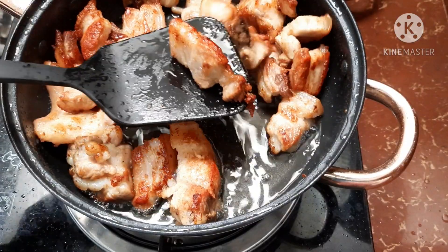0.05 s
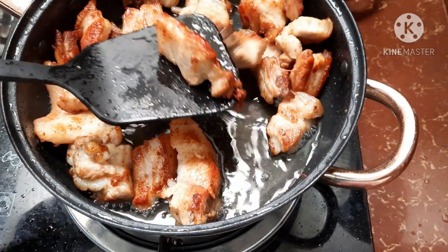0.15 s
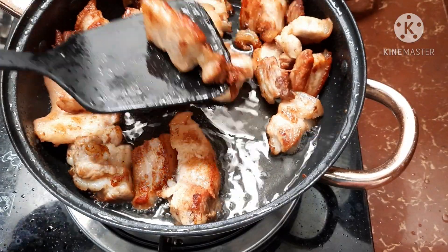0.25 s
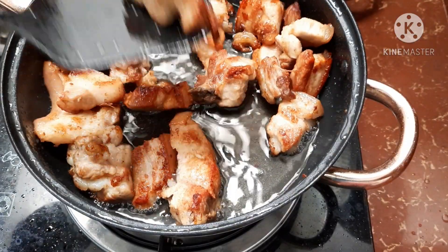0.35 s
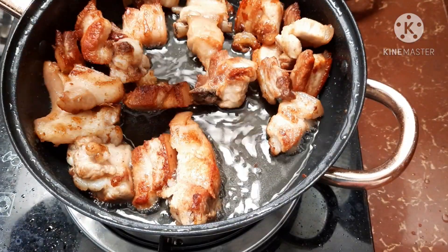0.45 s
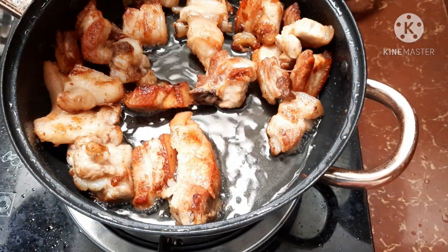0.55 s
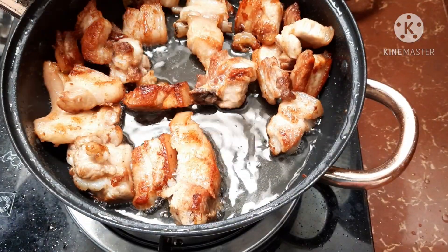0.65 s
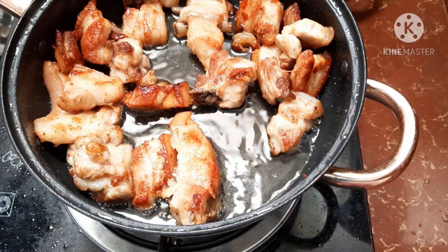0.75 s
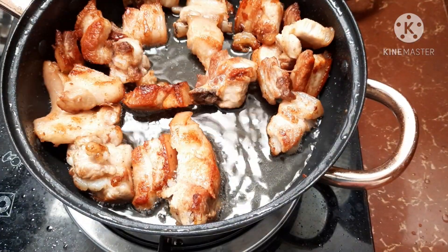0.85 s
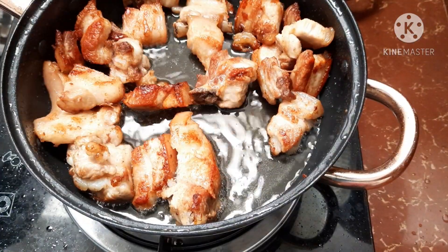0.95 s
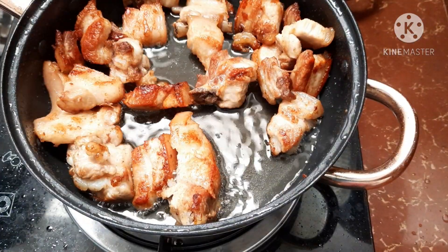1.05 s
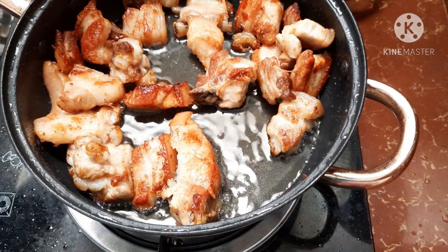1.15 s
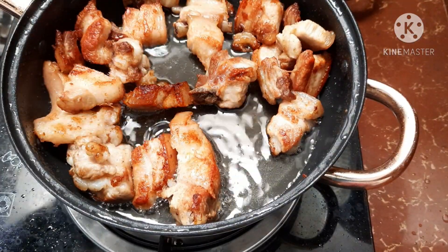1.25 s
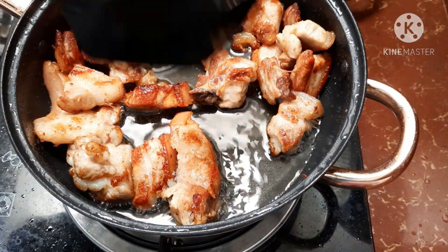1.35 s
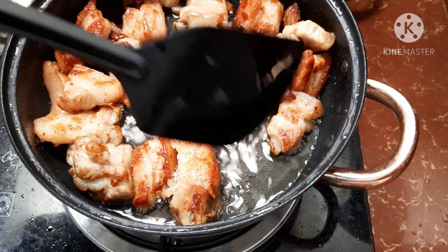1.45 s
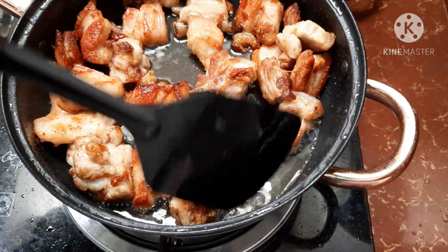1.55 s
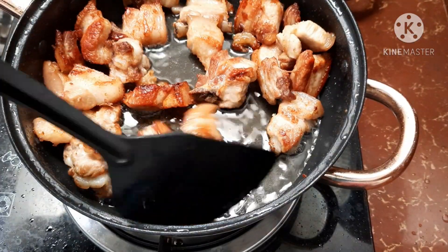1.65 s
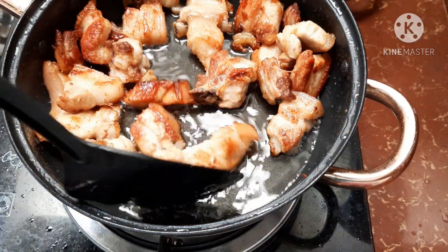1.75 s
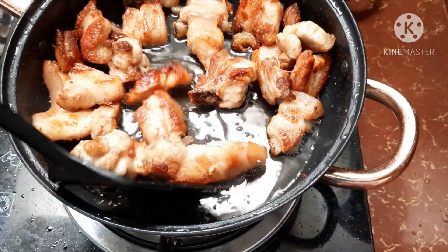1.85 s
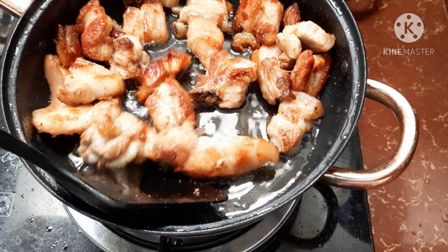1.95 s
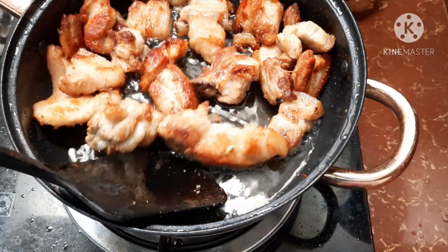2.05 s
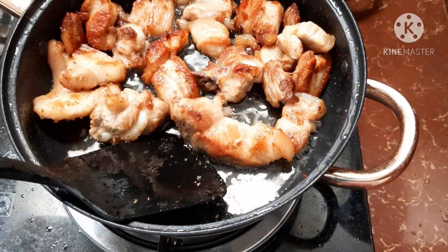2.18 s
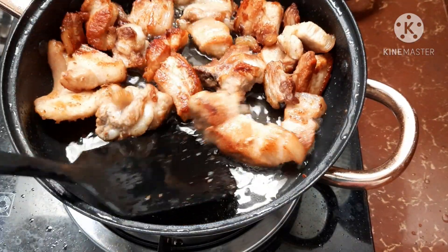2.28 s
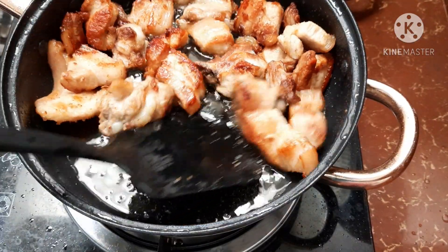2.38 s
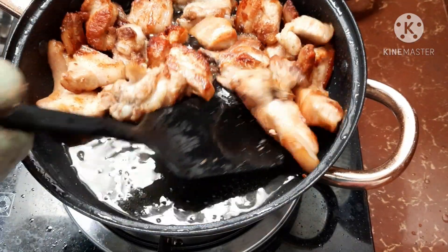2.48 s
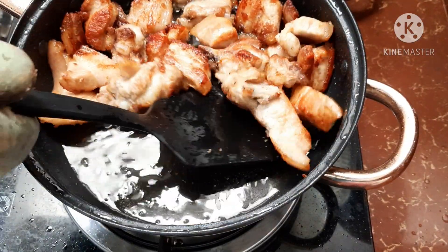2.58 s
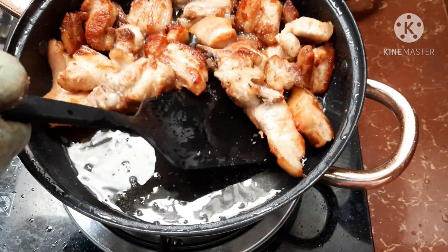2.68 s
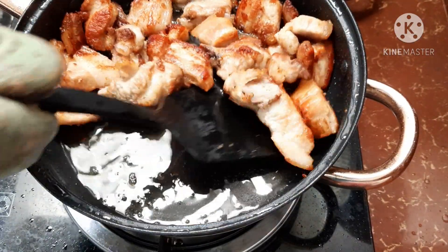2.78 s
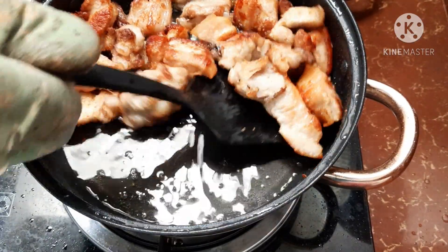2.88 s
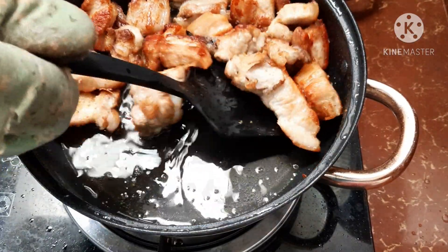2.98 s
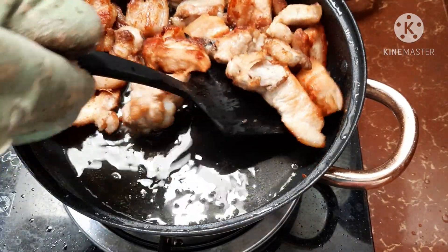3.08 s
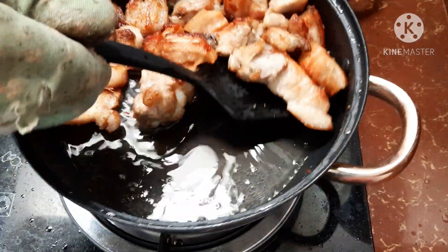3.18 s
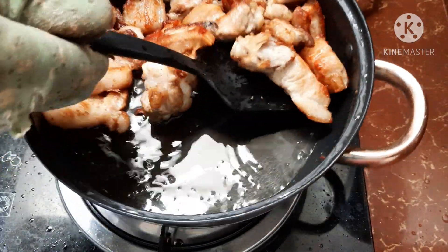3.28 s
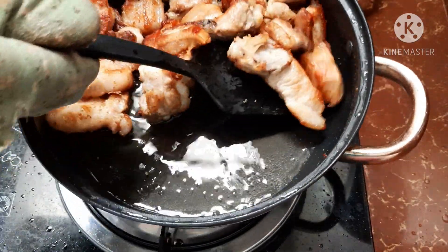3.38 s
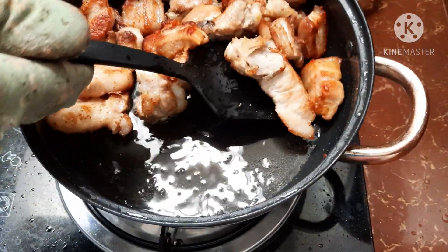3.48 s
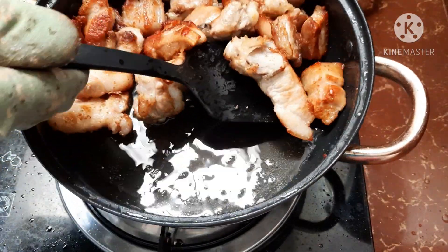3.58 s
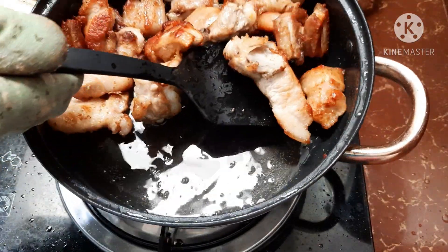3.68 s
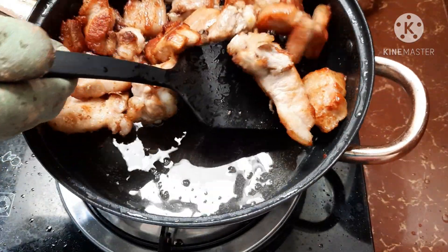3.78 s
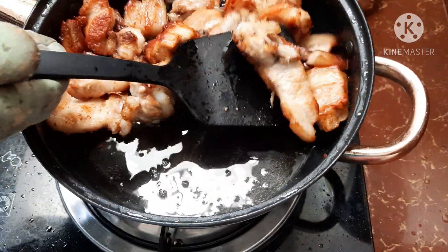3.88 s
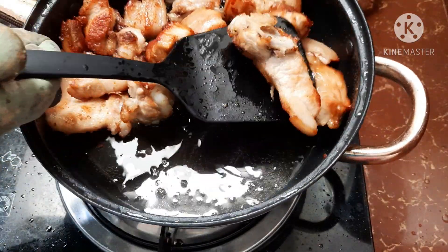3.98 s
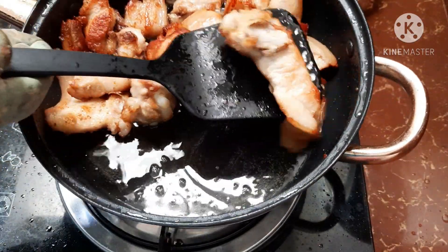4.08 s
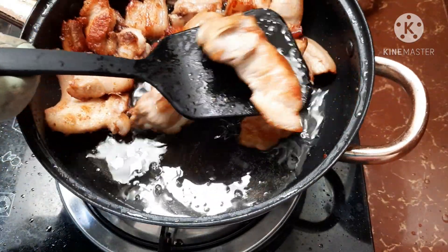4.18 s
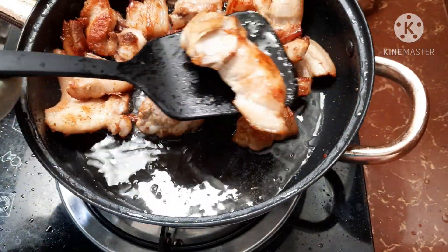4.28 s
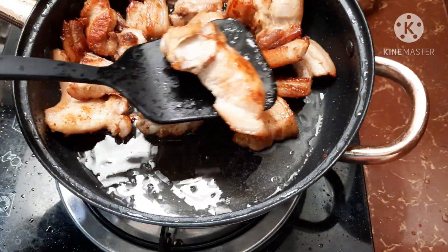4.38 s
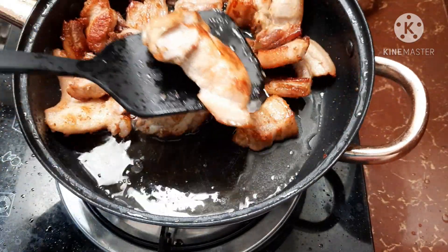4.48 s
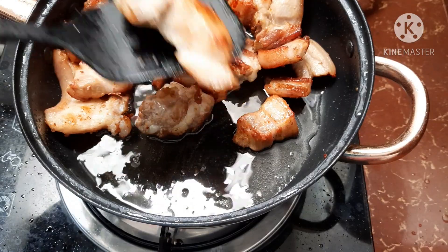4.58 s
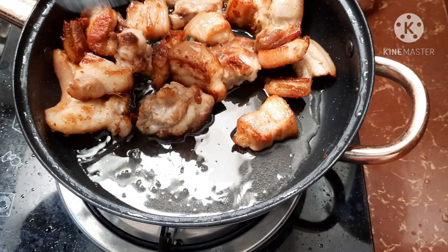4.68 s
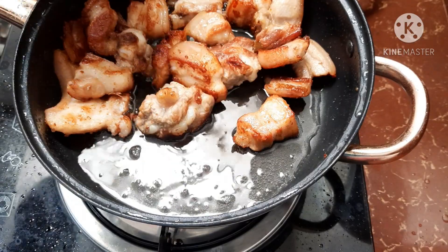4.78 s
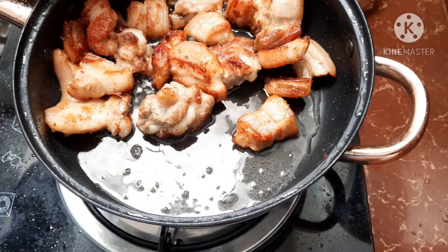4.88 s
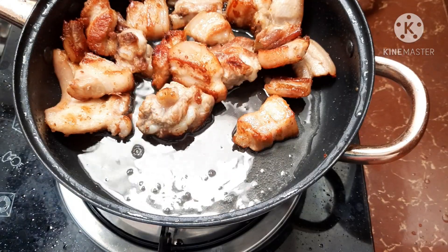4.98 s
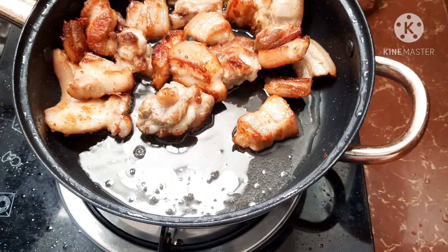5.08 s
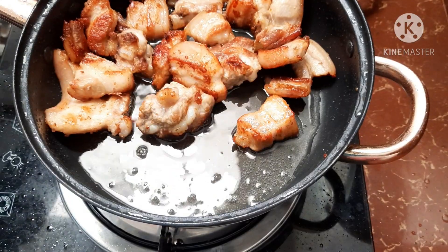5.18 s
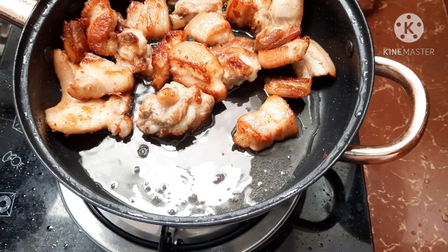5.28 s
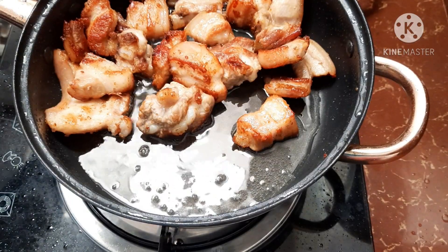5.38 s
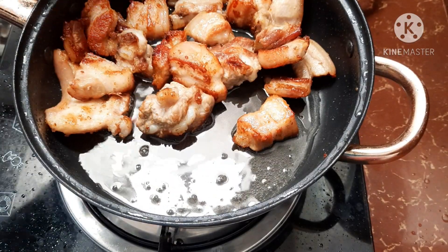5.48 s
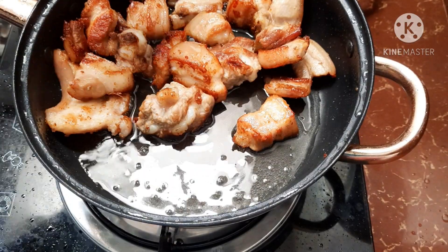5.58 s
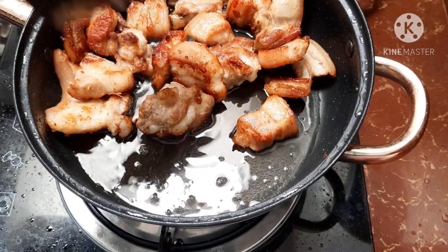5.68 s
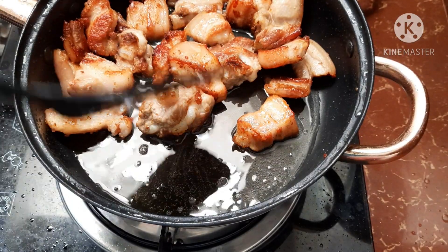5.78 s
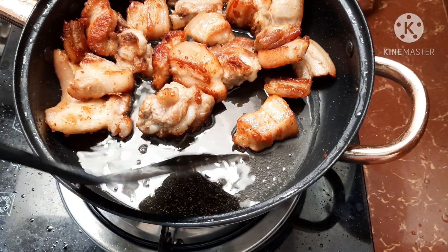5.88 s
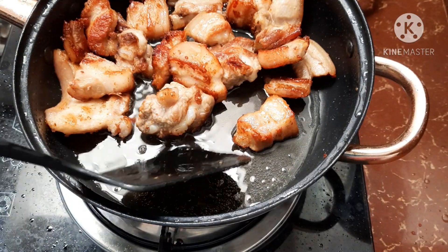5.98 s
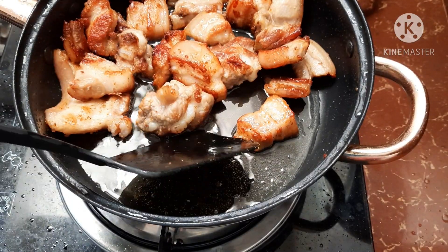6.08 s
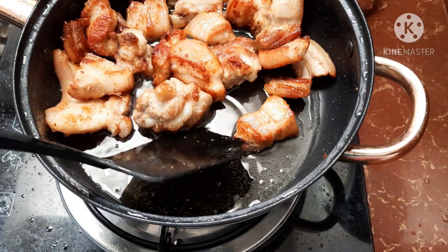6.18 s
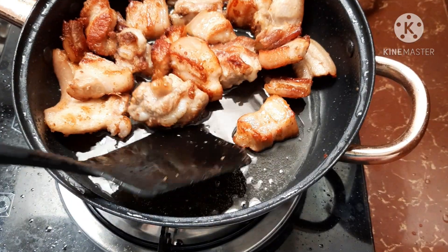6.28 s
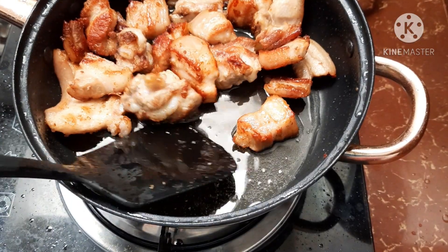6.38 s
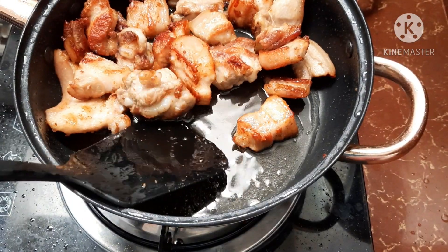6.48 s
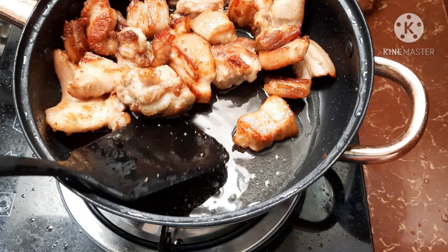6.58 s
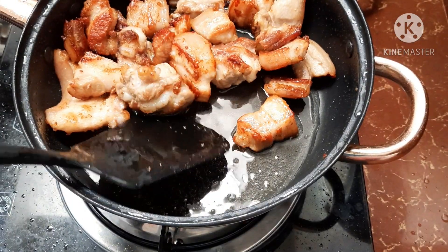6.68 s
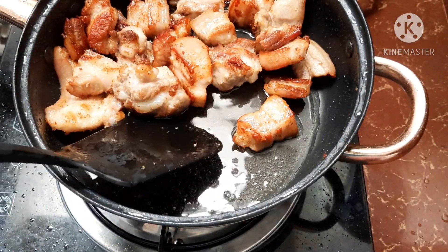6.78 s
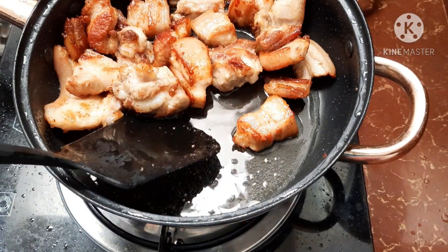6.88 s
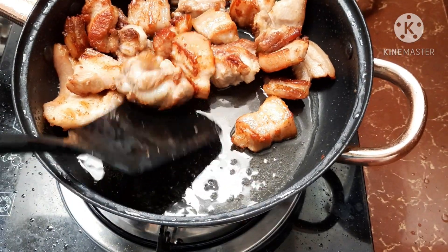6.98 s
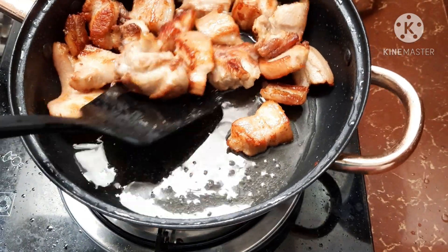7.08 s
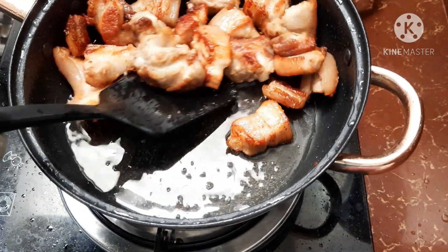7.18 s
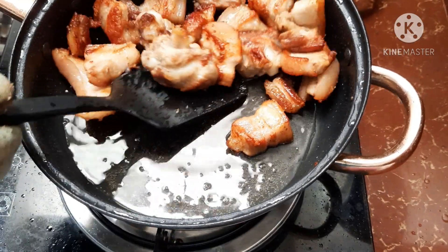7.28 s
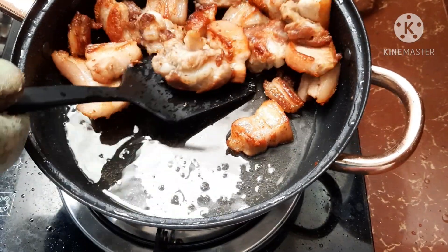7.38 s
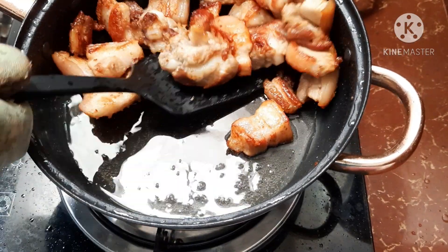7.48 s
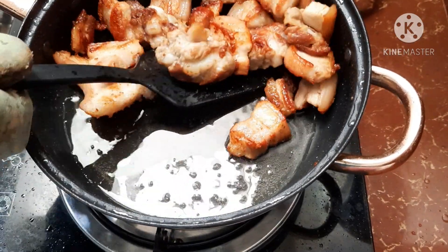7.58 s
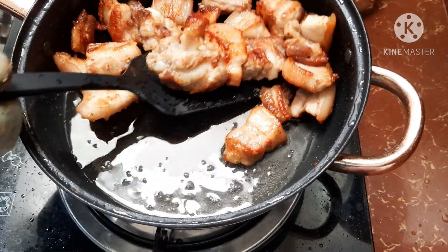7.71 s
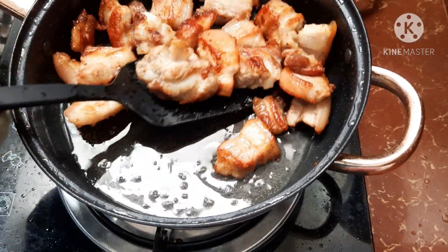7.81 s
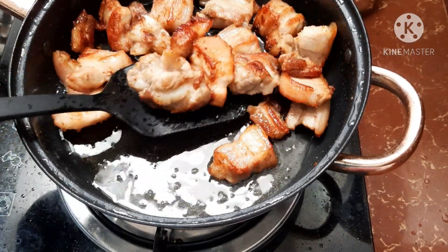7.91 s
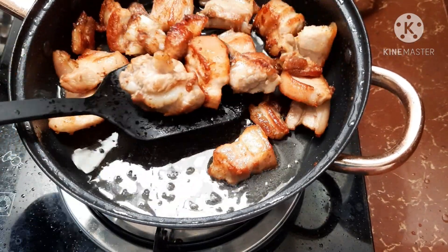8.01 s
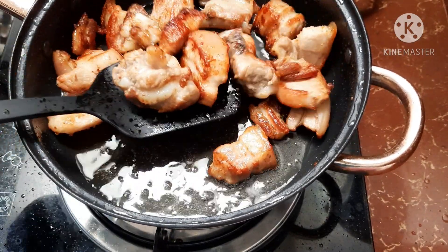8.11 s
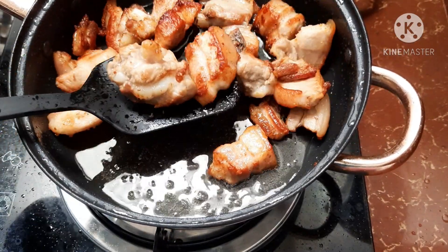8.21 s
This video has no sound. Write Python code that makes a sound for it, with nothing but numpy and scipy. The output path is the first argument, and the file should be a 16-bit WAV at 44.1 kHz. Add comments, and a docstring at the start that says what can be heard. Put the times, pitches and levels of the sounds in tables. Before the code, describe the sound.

A plastic spatula knocks dully and scrapes briefly in a deep frying pan, over a steady soft fat hiss in a small hard kitchen.

```python
"""In a small hard kitchen a plastic spatula knocks and scrapes in a deep frying pan.
Each blow rings the damped modes of the pan and booms its stand; uneven slips make the blade judder and rasp.
Light ticks, bursting fat bubbles and faintly singing vessels are damped notes.
Shaped noise gives the frying hiss and far traffic, drifting partials the hum of a motor.
Two microphones a hand apart hear it all."""
import sys
import numpy as np
from scipy import signal
from scipy.fft import rfft, irfft, next_fast_len
from scipy.io import wavfile
from scipy.ndimage import uniform_filter1d

SR = 44100
rng = np.random.default_rng(int(sys.argv[2]) if len(sys.argv) > 2 else 0)


def dump(signal):
    """Clip the signal to [-1, 1] and save it as 16-bit WAV at the path in sys.argv[1]."""
    limited = np.clip(np.atleast_2d(signal).T, -1, 1)
    pcm = np.round(limited * 32767).astype(np.int16)
    wavfile.write(sys.argv[1], SR, pcm)


N = 363763

# Modes of the pan before they are varied at random and damped by a blow.
# Each row: frequency in Hz, relative level in dB, time to fall by 60 dB in s.
PAN_MODES = [(270, -3, .09), (312, 0, .11), (351, 1, .13), (433, -5, .08), (530, -8, .04), (605, 0, .11),
             (700, -8, .04), (800, -13, .035), (980, -13, .04), (1247, -6, .06), (1365, -8, .045),
             (1485, -6, .055), (1810, -7, .05), (2200, -9, .035), (2540, -5, .04), (2740, -7, .045),
             (3050, -10, .03), (3510, -15, .03), (4230, -15, .035)]
# How alike the two channels are. Each row: frequency in Hz, likeness from -1 to 1.
LIKENESS = [(60, 1), (240, 0.68), (950, 0.36), (3770, -0.085), (15000, -0.013)]

HARD_DB, FOCUS_PER_DB = 20., .9  # the softer a thud than this, the fewer modes it wakes (dB an octave per dB)
MUFFLE_DB = 12  # a soft blow leaves the blade lying on the pan: this much focus adds 1 to the ring's divisor
DETUNE, UNEVEN_DB = 0.012, 1.5  # random spread of the modes in pitch (as a fraction) and level
RATTLE_S, CLUSTER_S = 0.013, 0.013  # decay constants of the chatter after contact and of the crowded modes
PUNCH = 16.7  # first contact against the crowded modes that follow
LUMPY_DB = 3  # the crowded modes beat and rattle in uneven bursts
BOOM_HZ = 30.4  # divided by the thud pitch: the lower the thud, the more the stand booms
PRESS_SHARE, EASE_DB = 0.27, -6.5  # part of a stroke spent pressing harder; level at both ends
GRIT_DB = -6  # rough treble of a stroke against its judder
MOTOR_HZ = 60.85  # mean turning rate
DRIFT_S = .15  # the echoes drift back and forth between two patterns, half a turn in this time
EDGE_HZ = 15750  # upper band limit


def amp(db):
    """Gain of a level in dB."""
    return 10 ** (np.asarray(db) / 20)


def evened(x):
    """Scales to an rms of one."""
    return x / np.sqrt(np.mean(x ** 2) + 1e-20)


def peaked(x):
    """Scales to a peak of one."""
    return x / (abs(x).max() + 1e-12)


def unit(x):
    """Scales to an energy of one."""
    return x / np.linalg.norm(x)


def read(points, hz):
    """Value of a spectrum table at hz, interpolated over log frequency."""
    f, value = np.transpose(points)
    return np.interp(np.log(hz + 1), np.log(f + 1), value)


def add(mix, s, sound, pan_db=0.):
    """Mixes a sound in at a time in seconds; a positive pan leans left, a negative one right."""
    part = mix[:, round(s * SR):][:, :len(sound)]
    part += sound[:part.shape[1]] * amp([[pan_db / 2], [-pan_db / 2]])


def band(x, low_hz, high_hz):
    """Causal band-pass."""
    edges = [low_hz, min(high_hz, SR / 2.2)]
    return signal.sosfilt(signal.butter(2, edges, "bandpass", fs=SR, output="sos"), x)


def ring(modes, t, boost_db=0.):
    """Sum of dying modes, neighbours of opposite sign."""
    hz, db, t60 = np.transpose(modes)[:, :, None]
    sign = (-1) ** np.arange(len(hz))[:, None]
    return (sign * amp(db + boost_db - 60 * t / t60) * np.sin(2 * np.pi * hz * t)).sum(0)


def varied_modes():
    """The pan's modes, varied slightly at random in pitch and level for each blow or stroke."""
    hz, db, t60 = np.transpose(PAN_MODES)
    shift, weight = rng.standard_normal((len(PAN_MODES), 2)).T
    return np.transpose([hz * (1 + DETUNE * shift), db + UNEVEN_DB * weight, t60])


def knock(thud_db, clack_db, crack_db, thud_hz, clack_hz):
    """A sharp contact and its rattle ring the damped pan; the spot struck favours the modes near two pitches."""
    t = np.arange(SR // 8) / SR
    mode_hz = np.array(PAN_MODES)[:, :1]
    focus_db = FOCUS_PER_DB * max(HARD_DB - thud_db, 0)
    contact = t == 0
    chatter = unit(rng.standard_normal(len(t)) * np.exp(-t / RATTLE_S) * np.minimum(t / 0.0025, 1))
    blow = chatter + 3 * contact
    modes = varied_modes() / [1, 1, 1.5 + focus_db / MUFFLE_DB]

    def struck_near(hz):
        """The blow rung through the modes, weaker with their distance in octaves from hz."""
        ringing = ring(modes, t, -focus_db * abs(np.log2(mode_hz / hz)))
        return signal.fftconvolve(blow, ringing)[:len(t)]

    # a broad blow also wakes many modes too close to tell apart
    lumps = amp(LUMPY_DB * evened(uniform_filter1d(rng.standard_normal(len(t)), size=100)))
    crowd = rng.standard_normal(len(t)) * lumps * np.exp(-t / CLUSTER_S)
    dense = unit(crowd + PUNCH * contact)

    thud = unit(band(band(struck_near(thud_hz), 175, 1020), 175, 1030))
    thud += amp(13.5 - .5 * focus_db) * band(band(dense, 223, 780), 220, 770)
    thud += BOOM_HZ / thud_hz * unit(band(blow, 94, 213))  # the stand booms
    clack = unit(band(struck_near(clack_hz), 1090, 4600))
    clack += amp(18 - 0.66 * focus_db) * band(band(dense, 950, 2900), 960, 2900)
    crack = unit(band(chatter + 0.23 * contact, 2400, 11200))
    return amp(thud_db) * unit(thud) + amp(clack_db) * unit(clack) + amp(crack_db) * crack


def slips(count, per_s):
    """Sparse clicks of uneven size and random sign."""
    size = amp(3.6 * np.minimum(rng.exponential(1, count), 4))
    return size * rng.choice([-1, 1], count) * (rng.random(count) < per_s / SR)


def stroke(length, db):
    """Uneven slips of the blade shake the pan, harder as the hand presses, then easing off."""
    t = np.arange(0, length, 1 / SR)
    catches = slips(len(t), 460.0)
    shaken = signal.fftconvolve(catches, ring(varied_modes(), np.arange(SR // 10) / SR))[:len(t)]
    press_db = np.interp(t / length, [0, np.clip(PRESS_SHARE, .1, .9), 1], [EASE_DB, 0, EASE_DB])
    judder = evened(band(band(shaken, 230, 920), 210, 880))
    grit = evened(band(catches, 430, 2140))
    return amp(db + press_db) * (judder + amp(GRIT_DB) * grit)


def blade_on_pan():
    """Places the knocks and the dragged strokes that excite the pan's modes."""
    # Blows on the pan. Each row: start in seconds, then energies of thud, clack and crack in dB before
    # the mix, thud pitch in Hz, clack pitch in Hz.
    knocks = [(.998, -16, -13, -24, 890, 970), (1.004, -6.5, -9, -5, 910, 1400),
              (1.657, -9, -12.5, -17.5, 495, 1230), (1.758, 8.5, -12, -25, 325, 990),
              (1.798, -4.5, -29, -29, 348, 1245), (1.835, -5.5, -30, -38, 333, 1245),
              (2.184, -10.5, -14.5, -27, 343, 810), (3.257, 14.5, 12.5, 2, 315, 1370),
              (3.406, 12.5, 11, 1.5, 298, 2340), (5.893, 11.5, 5, -6, 604, 1380),
              (5.9, 18, -22, -26, 362, 1245), (5.953, 5, -4.5, -16, 347, 1240),
              (6.074, -2, -27.5, -25, 426, 1245), (6.098, -5, -39, -23, 320, 1245),
              (6.311, -14.5, -34, -44, 265, 1675), (6.525, -10.5, -14.5, -22, 347, 1440),
              (6.578, -4.5, -22.5, -40, 350, 970), (7.138, -5, -10, -22, 716, 1340),
              (7.143, -0.5, -18, -32, 322, 1245), (7.16, 1, -14, -27, 735, 1365),
              (7.171, -3, -18, -26, 500, 1000), (7.574, -17.5, -17.5, -34, 325, 1950),
              (7.781, -7.5, -9.5, -17.5, 810, 1240)]
    # The pan juddering under the dragged blade. Each row: start in seconds, length in seconds,
    # level at full press in dB before the mix.
    strokes = [(1.669, 0.077, -38), (2.189, 0.12, -48), (7.082, 0.14, -38.5), (7.767, 0.094, -45)]
    pan = np.zeros((2, N))
    for s, *blow in knocks:
        add(pan, s, knock(*blow), -2.5)
    for s, *drag in strokes:
        add(pan, s, stroke(*drag), -1.5)
    return pan


def rasp(length, db, hz):
    """Dense grit that swells and fades."""
    count = round(length * SR)
    grit = evened(band(slips(count, 1800.0), hz / 1.97, hz * 1.28))
    return amp(db) * grit * signal.windows.tukey(count, .6)


def ping(db, hz, t60, click):
    """One damped note behind a soft click."""
    t = np.arange(SR // 8) / SR
    note = ring([(hz, 0, t60)], t) * np.minimum(t / 0.00046, 1)
    snap = rng.standard_normal(len(t)) * t * np.exp(-t / 0.0005)
    snap = band(band(snap, .7 * hz, 1.5 * hz), .7 * hz, 1.5 * hz)
    return amp(db) * peaked(note + click * peaked(snap))


def small_sounds():
    """Places ticks and fat spits as short damped notes, and rasps as bursts of grit."""
    # Light ticks of the blade and of nearby crockery.
    # Each row: start in seconds, peak level in dB before panning and mix, pitch in Hz.
    ticks = [(.081, -37, 830), (.173, -38.5, 1280), (.337, -39.5, 1270), (0.883, -35.5, 1070),
             (0.606, -35.5, 1750), (1.364, -28.5, 1480), (1.495, -33.5, 1570), (1.511, -34, 3080),
             (1.889, -33.5, 960), (2.32, -30, 850), (2.976, -32, 2530), (5.452, -34, 1910),
             (5.849, -32, 2520), (6.047, -32.5, 1320), (6.369, -34, 2170), (6.404, -36, 1800),
             (6.45, -34, 1680), (6.745, -33.5, 2300), (6.854, -38, 1680), (7.083, -29.5, 2160),
             (7.299, -32.5, 2450), (7.919, -28.5, 1720)]
    # Fat bubbles bursting. Each row: start in seconds, peak level in dB before panning and mix,
    # pitch in Hz, left over right in dB.
    spits = [(0.0824, -19, 12200, -1.0), (7.267, -25.5, 6900, 0.0), (7.763, -25.5, 7240, 5),
             (8.205, -15, 6940, 2.5)]
    # The blade edge rasping through the fat. Each row: start in seconds, length in seconds,
    # level in dB before fades and mix, pitch in Hz.
    rasps = [(1.358, 0.03, -44.5, 4530), (2.484, 0.065, -47, 7100), (2.536, 0.065, -44, 4020),
             (2.678, 0.12, -50.5, 3630), (6.523, 0.032, -50, 3900), (7.075, 0.056, -46, 2000),
             (7.241, 0.13, -52, 2450), (7.726, 0.11, -45, 2240)]
    small = np.zeros((2, N))
    for s, *note in ticks:
        add(small, s, ping(*note, t60=.022, click=1.1), -1.2)
    for s, db, hz, pan_db in spits:
        add(small, s, ping(db, hz, t60=0.0024, click=0.57), pan_db)
    for s, *grit in rasps:
        add(small, s, rasp(*grit))
    return small


def bowl(length, *mode):
    """A thin decaying note that is cut short."""
    t = np.arange(round(length * SR)) / SR
    return ring([mode], t) * signal.windows.tukey(len(t), .15)


def nearby_vessels():
    """Thin vessels nearby are nudged, sing on one mode each, and are damped."""
    # Each row: start in seconds, length in seconds, pitch in Hz, level in dB, time to fall by 60 dB in s.
    notes = [(1.007, .06, 1365, -33, .2), (1.1, .03, 1370, -46, .2), (6.53, .47, 1014, -56, 6),
             (7.005, .07, 1055, -58, 4), (6.6, .2, 1567, -60, 1.2)]
    vessel = np.zeros((2, N))
    for s, *note in notes:
        add(vessel, s, bowl(*note))
    return vessel


def kitchen(x):
    """Sparse taps of random sign, each band dying at its own speed; the bass is alike in both microphones."""
    # Reverb of the room. Each row: frequency in Hz, time to fall by 60 dB in s.
    decay = [(150, 0.8), (270, 0.15), (450, 0.35), (1000, 0.3), (3000, 0.34), (8000, 0.34)]
    wet, turn = np.zeros((2, N)), np.pi * np.arange(N) / SR / DRIFT_S
    for k in range(2):
        taps = np.zeros((2, SR // 2))
        at = np.arange(120, SR // 2 - 20, 20)
        at = at + rng.integers(0, 20, (2, len(at)))
        np.put_along_axis(taps, at, rng.choice([-1., 1.], at.shape), 1)
        hz, t, z = signal.stft(taps, SR, nperseg=256)
        same = np.clip(read(LIKENESS, hz), -1, 1)[:, None]
        z[1] = same * z[0] + np.sqrt(1 - same ** 2) * z[1]
        fade = amp(-60 * t / read(decay, hz)[:, None])
        tail = signal.istft(z * fade, SR, nperseg=256)[1]
        echoes = signal.oaconvolve(x, tail / np.linalg.norm(tail[0]), axes=1)[:, :N]
        wet += np.cos(turn + np.pi * k / 2) * echoes  # the two patterns trade places
    return wet


def noise(spectrum, size, patchy_db, level_db):
    """Two-channel random spectra with drifting patches; level_db(t, hz) shapes them in time."""
    hop = size // 4
    frames, hz = N // hop + 5, np.fft.rfftfreq(size, 1 / SR)[:, None]
    a, b, c, d, patches = rng.standard_normal((frames, len(hz), 5)).T
    patches = uniform_filter1d(uniform_filter1d(patches, size=12, axis=0), size=12, axis=1)
    patches = evened(patches)
    same, left = np.clip(read(LIKENESS, hz), -1, 1), a + 1j * b
    right = same * left + np.sqrt(1 - same ** 2) * (c + 1j * d)
    shape = amp(read(spectrum, hz))
    shape = shape / np.sqrt((shape ** 2).mean())
    t = np.arange(frames) * hop / SR
    z = np.array([left, right]) * shape * amp(patchy_db * patches + level_db(t, hz))
    return signal.istft(z, nperseg=size, noverlap=size - hop)[1][:, :N] / np.sqrt(size)


def frying_hiss():
    """Patchy noise: a hiss that follows the heat over a steadier room murmur."""
    # Murmur and hiss. Each row: frequency in Hz, relative density in dB per Hz.
    air = [(120, -17), (170, -22), (220, -5.5), (400, -13.5), (560, -2.5), (800, -4), (950, -9.5),
           (2000, -9.5), (5000, -11.5), (16000, -9)]
    # Each row: time in seconds, change of the hiss in dB.
    sizzle = [(0, 0.5), (1, 0.5), (2.6, 1), (3.2, 0.5), (4.2, -2), (5, -.5), (6.8, -2.5), (7.4, 1),
              (8.25, -1)]

    def heat_db(t, hz):
        """The change takes full hold above 840 Hz and ever less below."""
        return -44.5 + np.interp(t, *np.transpose(sizzle)) * np.clip(hz / 840.0, 0, 1)

    return noise(air, size=512, patchy_db=1.76, level_db=heat_db)


def traffic_rumble():
    """Low shaped noise that swells and sinks far off."""
    # Each row: frequency in Hz, relative density in dB per Hz.
    rumble = [(15, -49), (28, -40), (45, -6), (62, 2), (75, -7), (92, 15), (112, -3.5), (135, -2),
              (260, -27.5)]
    # Each row: time in seconds, level of the rumble in dB.
    swell = [(0, -56.5), (1, -49.5), (1.4, -60), (2.1, -45), (2.6, -60), (3, -51.5), (3.5, -43.5),
             (4.2, -64), (5, -53), (5.9, -54.5), (6.8, -57), (7.3, -56), (7.7, -49.5), (8.25, -53.5)]

    def swell_db(t, hz):
        """One level for all frequencies."""
        return np.interp(t, *np.transpose(swell)) + 0 * hz

    return noise(rumble, size=4096, patchy_db=-1.0, level_db=swell_db)


def wander(rate):
    """Slow random drift of rms one, with sines up to rate in Hz."""
    t = np.arange(0, N + 256, 256) / SR
    sines = (np.sin(2 * np.pi * (f * t + rng.random())) / np.sqrt(f) for f in np.geomspace(.15, rate, 10))
    return np.interp(np.arange(N) / SR, t, evened(sum(sines)))


def motor():
    """A buzz whose partials share a drifting pitch but swell and fade on their own."""
    # Each row: multiple of the turning rate, level in dB around which the partial drifts.
    partials = [(1, -63.5), (5, -72.5), (6, -74), (7, -71), (9, -69), (13, -68.5)]
    turns = np.cumsum(MOTOR_HZ * (1 + 0.004085 * wander(1.093))) / SR
    buzz = np.zeros(N)
    for k, db in partials:
        buzz += amp(db + 2.5 * wander(1.5)) * np.sin(2 * np.pi * (round(k) * turns + rng.random()))
    return buzz


def scene():
    """All sources in the kitchen; small sounds stir the room less than the heavy pan."""
    pan, small = blade_on_pan(), small_sounds()
    direct = amp(-7.0) * pan + amp(-7.0) * small + nearby_vessels()
    echoes = kitchen(amp(-4.5) * pan + amp(-6.5) * small)
    return direct + echoes + frying_hiss() + traffic_rumble() + motor()


def record(dry):
    """Coloured, unequal microphones, then the band limit."""
    # Port resonances of both microphones. Each row: frequency in Hz, gain in dB.
    microphone = [(4500, 2), (6500, 5.5), (8200, 1.5), (9600, -3), (11000, -0.5), (12500, 0.5), (15500, -4)]
    # Balance of the pair. Each row: frequency in Hz, left over right in dB.
    lean = [(60, -1.5), (240, 2), (950, -2.5), (3770, 1), (15000, -1.5)]
    size = next_fast_len(N)
    hz = np.fft.rfftfreq(size, 1 / SR)
    lean_db = read(lean, hz) / 2
    colour = amp(read(microphone, hz) + [lean_db, -lean_db])
    heard = irfft(rfft(dry, size) * colour, size)[:, :N]
    low_pass = signal.firwin(511, EDGE_HZ, window=("kaiser", 9), fs=SR)
    return signal.oaconvolve(heard, low_pass[None], "same")


dry = scene()
out = record(dry)
dump(out)
```